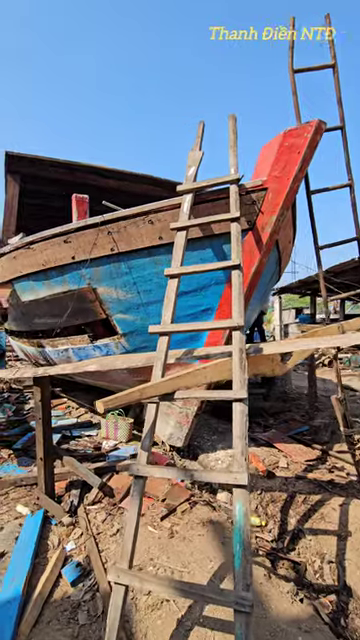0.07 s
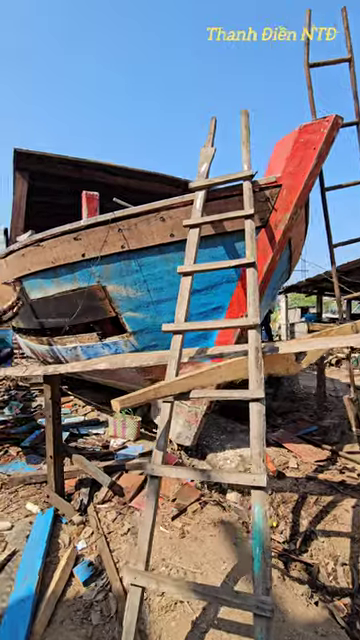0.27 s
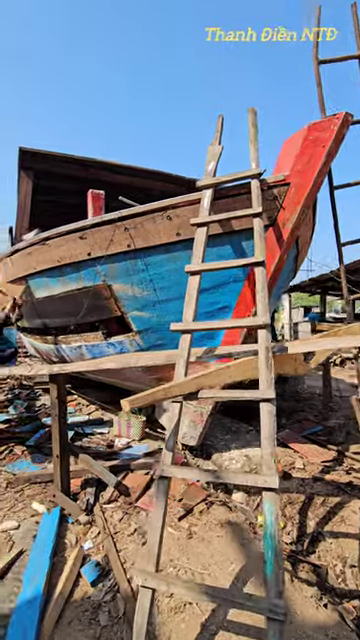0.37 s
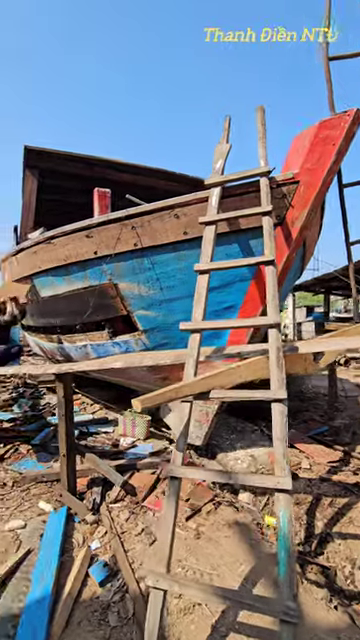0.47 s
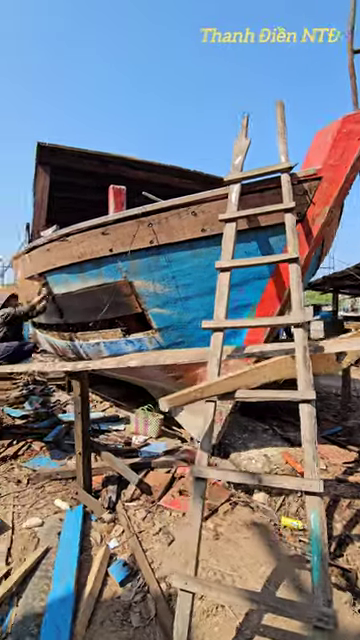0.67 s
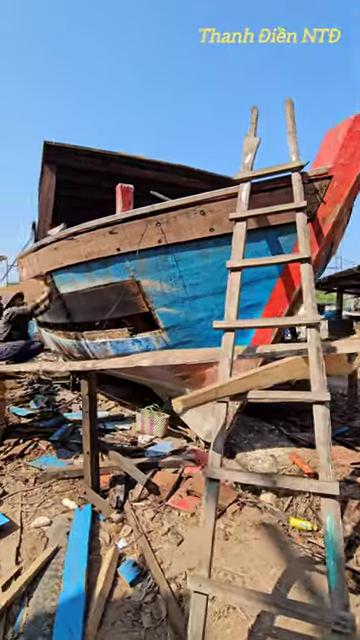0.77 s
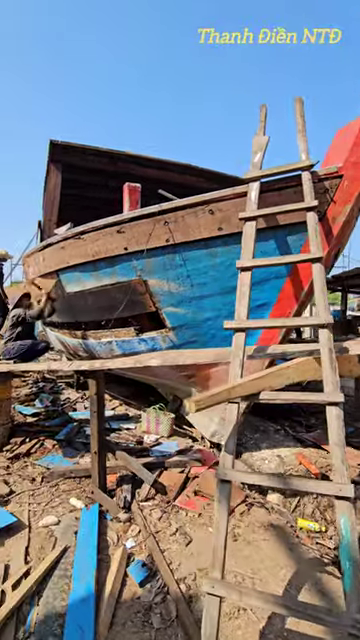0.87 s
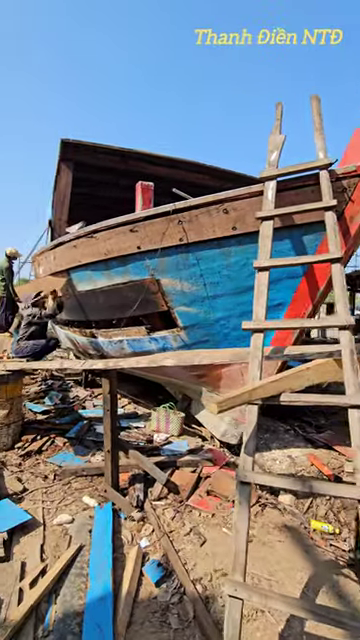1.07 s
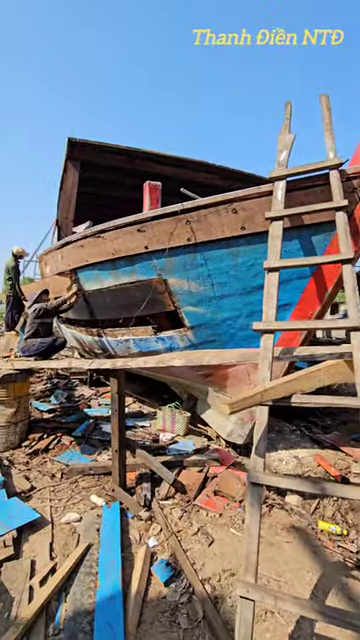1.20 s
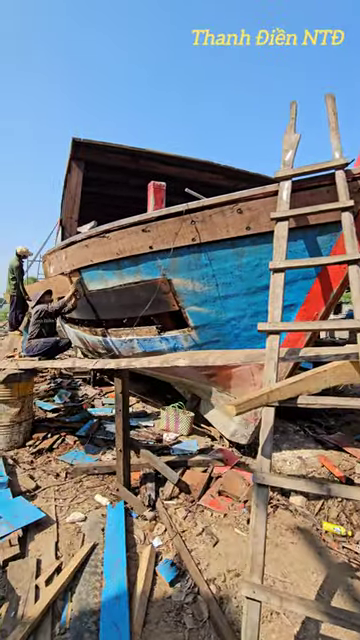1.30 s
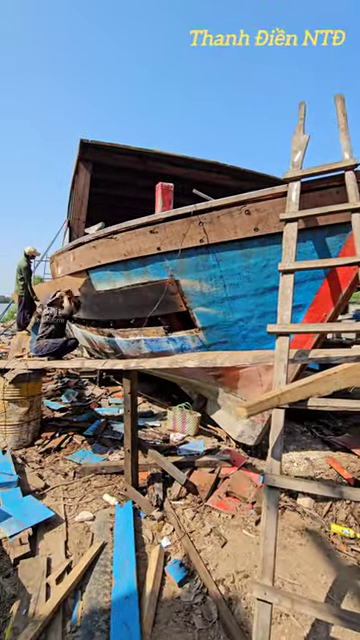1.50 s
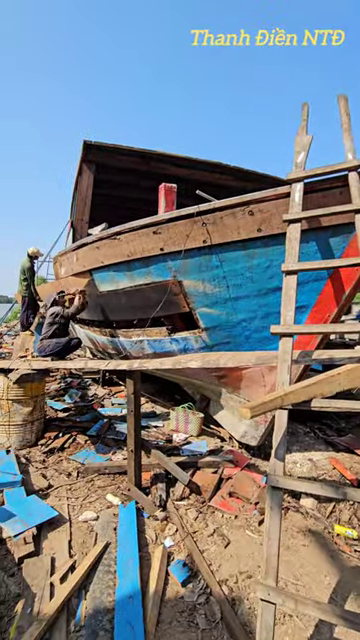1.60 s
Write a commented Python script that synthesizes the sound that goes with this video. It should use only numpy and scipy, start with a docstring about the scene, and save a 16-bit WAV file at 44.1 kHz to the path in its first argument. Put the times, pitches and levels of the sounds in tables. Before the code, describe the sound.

Three hammer blows land on a wooden boat hull in an open repair yard.

```python
"""A distant engine drones under the hiss of an open repair yard. Then three hammer blows land on the
plank hull of a propped-up wooden boat: each cracks, sets the planks ringing, scatters off timber and
neighbouring hulls and comes back from a far wall. Between blows, a far knock and a faint squeal.
The loudest peaks overload the microphone."""
import sys
import numpy as np
from scipy import signal
from scipy.fft import rfft, irfft
from scipy.io import wavfile

SR = 44100
rng = np.random.default_rng(int(sys.argv[2]) if len(sys.argv) > 2 else 0)


def materialize(psi):
    """Save the field psi as 16-bit PCM at rate SR to the path in sys.argv[1].

    A 1-D psi becomes a single channel; in a 2-D psi each row is a channel.
    """
    bounded = np.clip(np.atleast_2d(psi).T, -1, 1)
    quanta = np.round(bounded * 32767).astype(np.int16)
    wavfile.write(sys.argv[1], SR, quanta)


N = 72765
T = np.arange(N) / SR


def from_db(db):
    """Decibels to gain."""
    return 10 ** (np.asarray(db) / 20)


def at_hz(table, hz, column=1):
    """Read a table column on a log-frequency axis."""
    table = np.array(table)
    return np.interp(np.log(hz), np.log(table[:, 0]), table[:, column])


def filtered(x, hz, kind, order=2):
    """Butterworth filter."""
    sos = signal.butter(order, np.clip(hz, 10, .45 * SR), kind, fs=SR, output="sos")
    return signal.sosfilt(sos, x + 1e-18)


def delayed(x, s):
    """A stereo sound, s seconds later."""
    return np.array([np.interp(T - s, T, side, left=0) for side in x])


def from_left(x, lag_s=.0001):
    """A source to the left reaches the microphone's right side later."""
    return np.array([x, np.interp(T - lag_s, T, x, left=0)])


def decay(t60):
    """A fall of 60 dB every t60 seconds."""
    return from_db(-60 * T / t60)


def ringing(modes):
    """Damped sines of alternating sign, started by one contact."""
    return sum((-1) ** (k + 1) * from_db(db) * decay(t60) * np.sin(2 * np.pi * hz * T)
               for k, (hz, db, t60) in enumerate(modes))


def noise_bands(correlation):
    """Half-octave bands of stereo noise as (centre Hz, band); neighbours are unrelated."""
    edges = 22 * 2 ** np.arange(0, 10, .5)
    white = rng.standard_normal((2, 2, N))
    for k, (low, high) in enumerate(zip(edges, edges[1:])):
        mid, side = filtered(white[k % 2], [low, high], "band")
        hz = np.sqrt(low * high)
        alike = at_hz(correlation, hz)
        yield hz, np.sqrt((1 + alike) / 2) * mid + np.sqrt((1 - alike) / 2) * side * [[1], [-1]]


def narrow_noise(hz, width_hz):
    """Noise in one narrow resonance; rms 1."""
    bins = np.arange(N // 2 + 1) * SR / N
    noise = irfft(rfft(rng.standard_normal(N)) / (1 + (2 * (bins - hz) / width_hz) ** 2), N)
    return noise / np.std(noise)


def wavering_tones(table):
    """One narrow noise resonance for each row."""
    return sum(from_db(db) * narrow_noise(hz, width_hz) for hz, db, width_hz in table)


# swells of the engine's low drone: t/s, level/dB
ENGINE_SWELLS = [(0, -41), (.055, -62), (.135, -33.5), (.2, -48), (.3, -39.5), (.45, -53.5), (.5, -37.5),
                 (.54, -43), (.72, -49.5), (.83, -40.5), (.96, -49), (1.13, -45.5), (1.2, -37.5),
                 (1.36, -46), (1.48, -43.5), (1.535, -35), (1.58, -54), (1.65, -58.5)]
# its steady hum: f/Hz, level/dB, width/Hz
ENGINE_HUM = [(157.2, -54.5, 1), (226, -63, 5.4), (287.2, -59, 7.8), (395.5, -58.5, 15), (483, -56, 33)]
def engine(drone_hz=89.2, wander_hz=7.3):
    """Far off, centred: an engine's low drone swells and fades under a steady hum."""
    hz = drone_hz + wander_hz * narrow_noise(0, width_hz=27.6)
    rms = from_db(np.interp(T, *np.transpose(ENGINE_SWELLS)))
    drone = rms * np.sqrt(2) * np.sin(2 * np.pi * np.cumsum(hz) / SR)
    return drone + wavering_tones(ENGINE_HUM)


# background of the yard: f/Hz, relative spectral level/dB
AIR_SPECTRUM = [(25, -29.5), (50, -11), (85, -6), (125, -13), (200, -17.5), (300, -19), (480, -21),
                (700, -23.5), (1200, -24.5), (2200, -32.5), (3200, -38), (5000, -43), (8000, -53),
                (12000, -57.5), (16000, -57)]
# its likeness at the microphone: f/Hz, left-right correlation
AIR_CORRELATION = [(100, .99), (290, 0.97), (640, 0.72), (1400, 0.38), (3000, 0)]
def yard_air(gain_db=-11, fade_db_per_s=2.5):
    """Open-air rumble and hiss all round, sinking as the listener walks on."""
    air = sum(from_db(at_hz(AIR_SPECTRUM, hz)) * band for hz, band in noise_bands(AIR_CORRELATION))
    return from_db(gain_db - fade_db_per_s * T) * air


# the struck plank's heavily damped modes: f/Hz, relative level/dB, t60/s
PLANK_MODES = [(778, 6, 0.002), (256, -27, 0.06), (2100, -13, 0.0093), (118.8, -19, 0.064)]
def strike(contact_hz=4660, crack_band_hz=(2140, 15000)):
    """At the hammer head: the plank's kick, the snap of the contact and the crackle after it."""
    kick = filtered(ringing(PLANK_MODES), contact_hz, "low", order=1)
    snap = from_db(-15) * decay(t60=.012)
    crackle = from_db(-25) * decay(t60=.078)
    crack = filtered(rng.standard_normal((2, N)) * (snap + crackle), crack_band_hz, "band")
    return from_left(kick) + delayed(crack, s=.000877)


# modes of the hull: f/Hz, relative level/dB, t60/s, left over right/dB
HULL_MODES = [(121, -24, .18, 0), (188, -27, .4, 1), (215, -26, .35, -3), (237, -21.5, .33, -3),
              (281, -20, .24, -1), (312, -28, .2, 2), (338, -30, .22, -2), (428, -35, .25, 9),
              (460, -36, .35, 8), (511, -27, .22, 5), (565, -24, .2, 2), (675, -23, .18, -1),
              (769, -18, .15, -1), (855, -20.5, .17, -1), (937, -19, .17, -4), (1049, -24, .22, 3),
              (1127, -27, .2, 9), (1339, -27, .2, -10), (1555, -35, .2, 2), (1628, -35, .18, 0),
              (2182, -31, .16, -7), (2263, -32, .16, -6)]
def hull_ring(lowest_hz=81):
    """One push starts all modes, each with its own balance; the hull radiates little deep bass."""
    ring = 0
    for hz, db, t60, pan_db in HULL_MODES:
        mode = decay(t60) * np.sin(2 * np.pi * hz * T)
        ring += from_db(db + np.array([[pan_db], [-pan_db]]) / 2) * from_left(mode)
    return delayed(filtered(ring, lowest_hz, "high"), s=.0007)


def flutter(hit, round_s=.01172, first_db=-1.5, loss_db=9):
    """The strike's midrange bounces to and fro, weaker on each of three rounds."""
    mids = filtered(hit, [740, 1670], "band", order=1)
    return sum(from_db(first_db - loss_db * k) * delayed(mids, round_s * (k + 1)) for k in range(3))


# likeness of scattered sound at the microphone: f/Hz, left-right correlation
SCATTER_CORRELATION = [(100, 0.97), (220, 1), (400, 0.64), (700, 0.76), (1300, 0.13), (2500, 0),
                       (5000, 0.048)]
def reflections(table):
    """Countless small reflections from all round: noise, each band dying at its own rate."""
    out = 0
    for hz, band in noise_bands(SCATTER_CORRELATION):
        settled = np.roll(band, -N // 4, axis=1)   # start past the filter's build-up
        out += from_db(at_hz(table, hz)) * decay(at_hz(table, hz, column=2)) * settled
    return out


def blow_colour(blow, bass_db, knock_db, treble_db):
    """No two blows land alike: bass, midrange knock and treble vary."""
    bass = (from_db(bass_db) - 1) * filtered(blow, 405, "low", order=1)
    knock = (from_db(knock_db) - 1) * filtered(blow, [1050, 1700], "band", order=1)
    treble = (from_db(treble_db) - 1) * filtered(blow, 2450, "high", order=1)
    return blow + bass + knock + treble


# scatter off the timber all round: f/Hz, relative spectral level/dB, t60/s
TIMBER_SCATTER = [(59.5, -24, 0.085), (125, -9.5, 0.25), (170, 0, 0.31), (281, -2, 0.31), (390, -14, 0.2),
                  (600, -2.5, 0.19), (834, -1.5, 0.18), (1440, -16, .23), (2040, -11, 0.16),
                  (3250, -18.5, 0.16), (6350, -27, .18), (11400, -25, 0.083), (16000, -40, 0.26)]
# the yard's faint, lingering tail: f/Hz, relative spectral level/dB, t60/s
YARD_TAIL = [(59.5, -19, 1.0), (190, -10, 1.0), (540, -18.5, 0.64), (1120, -18.5, 0.7), (2370, -31, 0.5),
             (5700, -39, 0.67), (15000, -63, 0.61)]
# blows on the hull: t/s, relative level/dB, extra bass/dB, extra knock/dB, extra treble/dB
HAMMER_BLOWS = [(0.2294, 0.5, 1.5, -7.5, -0.5), (0.7367, -0.5, 1.5, -0.5, 0), (1.2234, 0, -0.5, 0.5, -2.5)]
def hammering(scatter_db=4, rise_s=.0036, fresh_share=.7):
    """At the boat: every blow rings the same hull; its paths to the microphone shift each time."""
    hull = from_db(-.5) * hull_ring()
    steady_paths = np.sqrt(1 - fresh_share) * reflections(TIMBER_SCATTER)
    tail = reflections(YARD_TAIL)
    rise = 1 - np.exp(-T / rise_s)
    out = 0
    for s, db, bass_db, knock_db, treble_db in HAMMER_BLOWS:
        hit = strike()
        fresh_paths = np.sqrt(fresh_share) * reflections(TIMBER_SCATTER)
        scatter = from_db(scatter_db) * (steady_paths + fresh_paths)
        blow = hit + hull + flutter(hit) + rise * (scatter + tail)
        out += from_db(db) * delayed(blow_colour(blow, bass_db, knock_db, treble_db), s)
    return out


# echoes reaching the microphone: t/s, relative level/dB, low edge f/Hz, high edge f/Hz
YARD_ECHOES = [(.303, -18, 1500, 8600), (.3685, -25, 800, 13700), (.7768, -7.5, 950, 1740),
               (.7875, -10, 840, 1390), (.869, -33.5, 900, 9000), (1.2605, -2.5, 1400, 1840),
               (1.2745, -6.5, 820, 1800), (1.297, -18.5, 1020, 8000), (1.370, -22.5, 660, 6100)]
def echoes(ring_db=-4.5, smear_db=-4):
    """Across the yard, sheds and other hulls return thinner, smeared copies of strike and ring."""
    hit = strike() + from_db(ring_db) * hull_ring()
    out = 0
    for s, db, low_hz, high_hz in YARD_ECHOES:
        smear = rng.standard_normal((2, N)) * decay(t60=.09)
        smear *= from_db(smear_db) / np.sqrt(np.sum(smear ** 2) / 2)
        echo = hit + signal.fftconvolve(hit, smear, axes=1)[:, :N]
        echo = filtered(echo, low_hz, "high", order=3)
        echo = filtered(echo, high_hz, "low")
        out += from_db(db) * delayed(echo, s)
    return out


# modes of a piece of timber: f/Hz, level/dB, t60/s
TIMBER_MODES = [(456, -43, 0.1), (532, -35.5, 0.074)]
def far_knock():
    """Far off, a little to the left: a piece of timber is bumped and rings briefly."""
    return delayed(from_left(ringing(TIMBER_MODES)), s=.48)


# tones of the squeal: f/Hz, level at full swell/dB, width/Hz
SQUEAL_TONES = [(2100, -55, 86), (5512, -76, 70)]
def far_squeal(start_s=.932, length_s=.1):
    """Far off in the yard, a thin squeal swells and fades."""
    swell = np.sin(np.pi * np.clip((T - start_s) / length_s, 0, 1))
    return swell * wavering_tones(SQUEAL_TONES)


def scene():
    """From where the microphone stands: the yard's background, with the hammering on top."""
    return engine() + yard_air() + hammering() + echoes() + far_knock() + far_squeal()


def record(dry):
    """The overloaded microphone rounds the peaks; the treble is cut off by 17 kHz."""
    ceiling = 1.05
    rounded = ceiling * np.tanh(dry / ceiling)
    return signal.sosfilt(signal.cheby2(16, 70, 17000, fs=SR, output="sos"), rounded)


dry = scene()
out = record(dry)
materialize(out)
```